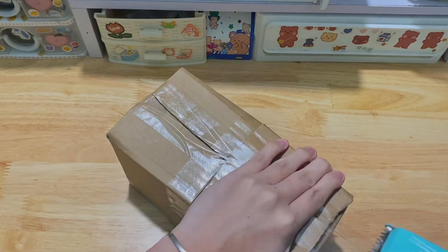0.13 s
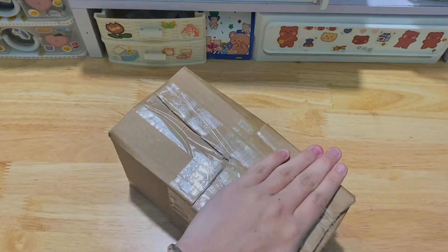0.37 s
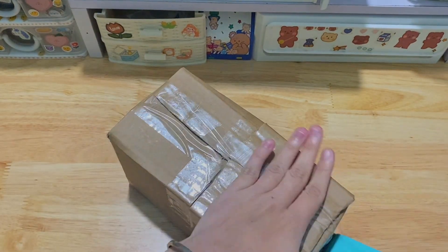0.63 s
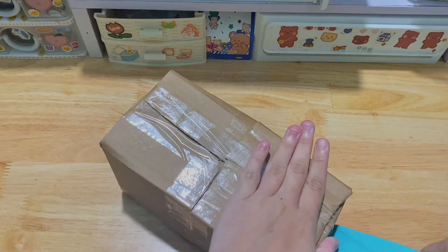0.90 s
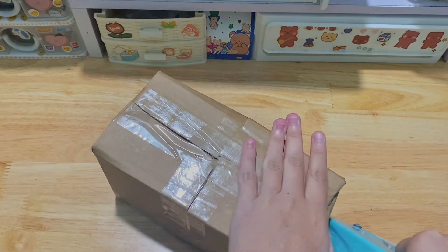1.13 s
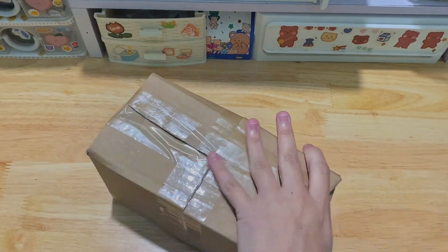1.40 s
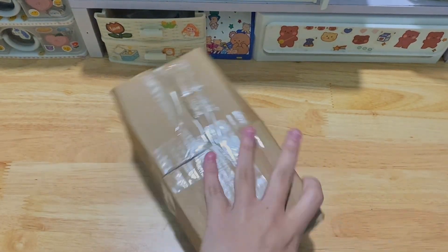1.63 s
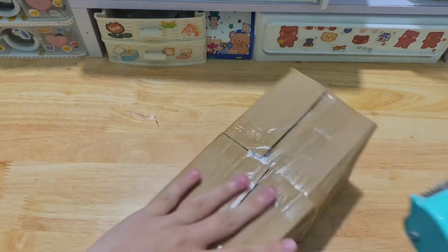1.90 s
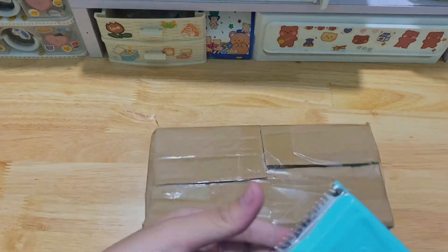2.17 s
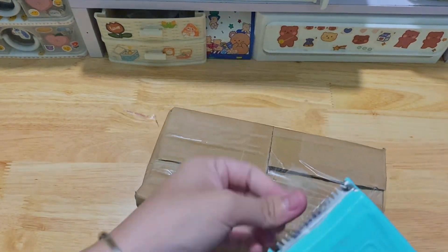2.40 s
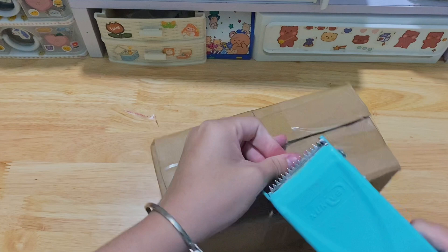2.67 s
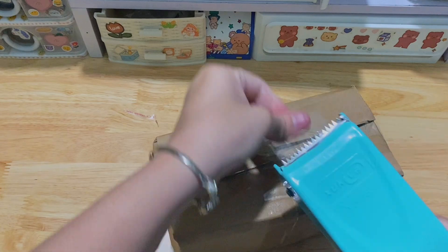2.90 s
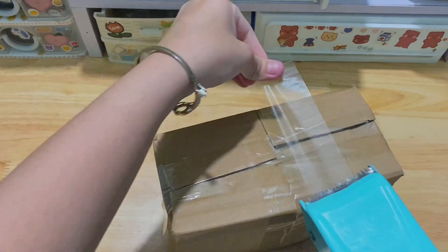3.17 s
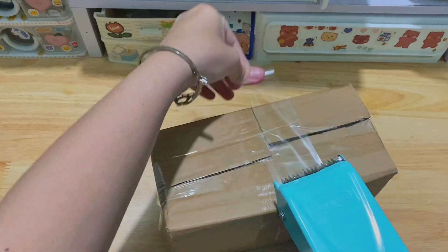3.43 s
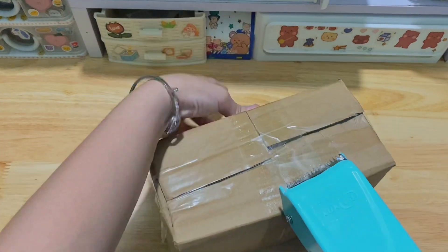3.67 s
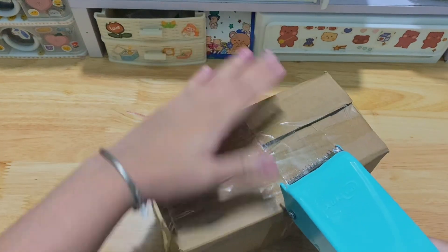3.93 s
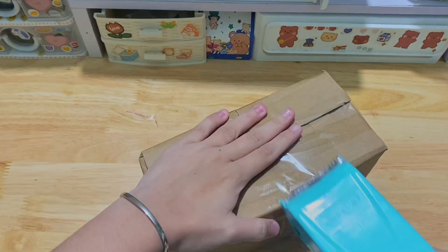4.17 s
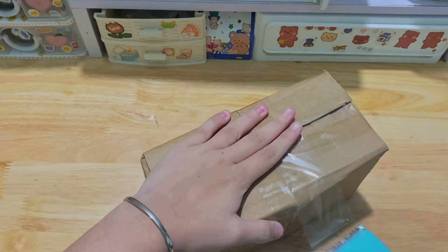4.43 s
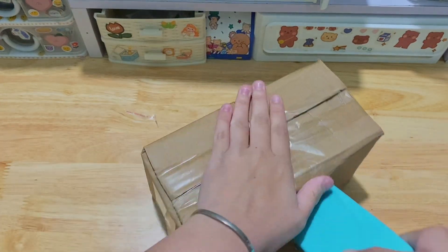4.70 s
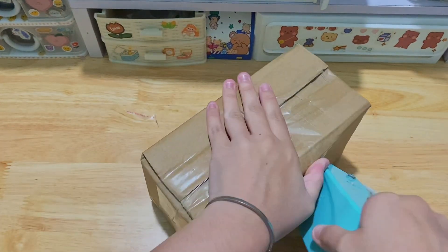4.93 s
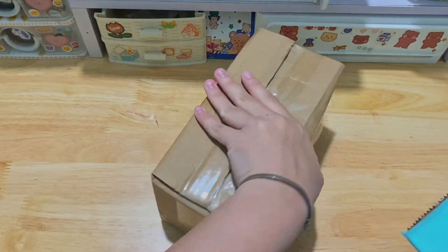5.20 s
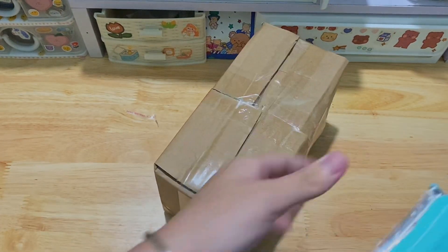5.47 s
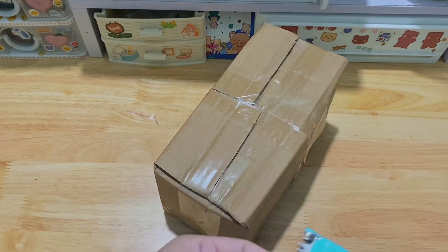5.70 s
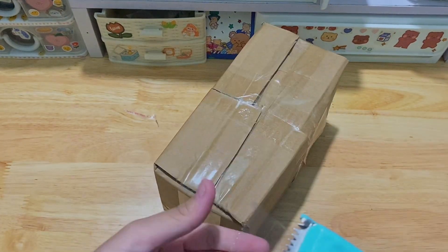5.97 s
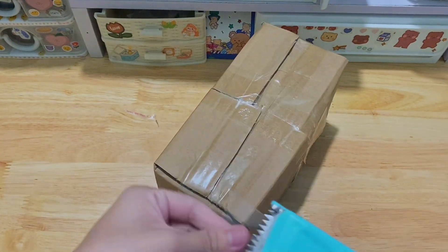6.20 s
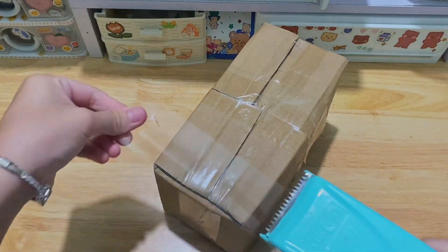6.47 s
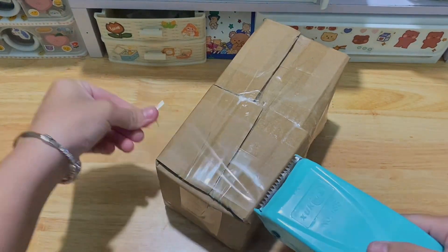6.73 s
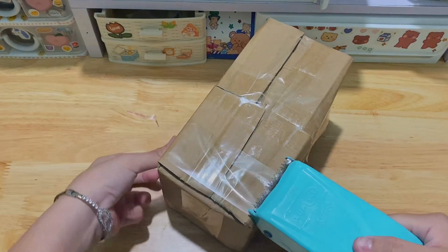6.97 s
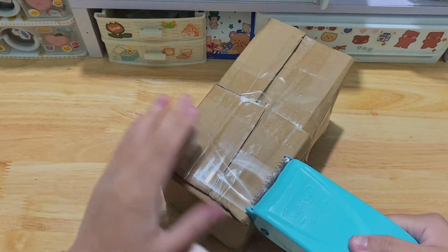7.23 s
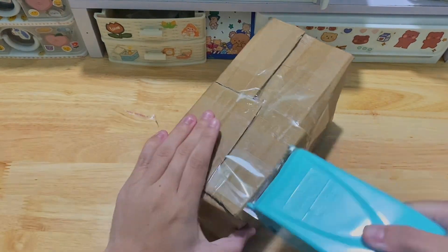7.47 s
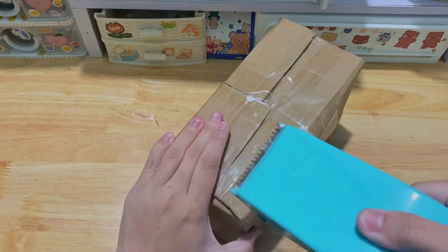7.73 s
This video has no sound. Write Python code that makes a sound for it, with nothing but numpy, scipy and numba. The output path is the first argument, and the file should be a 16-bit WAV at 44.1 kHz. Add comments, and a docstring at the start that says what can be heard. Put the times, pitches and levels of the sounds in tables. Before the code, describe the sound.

Very close in a small quiet room, tape rips off a handheld dispenser in stuttering jerks, then hands pat a hollow cardboard box. Film rustles and the dispenser ticks before another harsh pull, a loud snap and a flurry of thumps. A last short pull is followed by quiet handling, crackles and a soft press. A faint low rumble stays underneath.

```python
"""Packing tape pulled over a box

Tape comes off a handheld plastic dispenser in jerks, is pressed onto a cardboard box and torn at the blade.
Glue lets go in bursts of tiny noise pulses that ring resonances; single snaps and ticks are cracks of noise.
Palms thud on the box as sums of fading sines; filtered grains make the film rustle and the box scrape on
a wooden table. A finger squeaks in a small room with a low rumble; a phone close by limits the loudest moments."""
import sys
import numpy as np
from scipy import signal
from scipy.fft import rfft, irfft, next_fast_len
from scipy.io import wavfile
from scipy.ndimage import uniform_filter1d, minimum_filter1d
from numba import njit

SR = 44100
rng = np.random.default_rng(int(sys.argv[2]) if len(sys.argv) > 2 else 0)


def volts(x):
    """Linear amplitude factor 10**(x/20) for a level x in dB, scalar or array-like."""
    e = np.asarray(x, float) / 20
    return 10 ** e


def master(y):
    """Save y as 16-bit WAV."""
    cut = np.clip(np.atleast_2d(y).T, -1, 1)
    pcm = np.round(cut * 32767)  # scale
    wavfile.write(sys.argv[1], SR, pcm.astype(np.int16))


N = 346626
T = np.arange(N) / SR  # seconds


def unit(x):
    """Scaled to rms 1."""
    return x / np.sqrt(np.mean(x ** 2))


def on_log(table, hz):
    """Table of (Hz, value) read on a log-frequency axis."""
    f, v = np.transpose(table)
    return np.interp(np.log(hz + 1), np.log(f + 1), v)


def colour(x, table):
    """Causal (minimum-phase) filter with the spectrum of (Hz, dB) points."""
    cepstrum = irfft(on_log(table, np.fft.rfftfreq(4096, 1 / SR)) * np.log(10) / 20)
    # folding the cepstrum makes the filter respond only after its input
    cepstrum[1:2048] *= 2
    cepstrum[2049:] = 0
    response = irfft(np.exp(rfft(cepstrum)))
    return signal.fftconvolve(x, response)[:len(x)]


def ring(x, modes):
    """Sum of (Hz, width Hz, dB) resonances with alternating sign."""
    out = 0
    for k, (hz, width, db) in enumerate(modes):
        peak = signal.iirpeak(hz, hz / width, SR)
        out = out + (-1) ** k * volts(db) * signal.lfilter(*peak, x)
    return out


def band(x, lo_hz, hi_hz):
    """Band-pass."""
    return signal.sosfilt(signal.butter(2, [lo_hz, hi_hz], "band", fs=SR, output="sos"), x)


def add(out, s, piece):
    """Mix a piece in at s seconds."""
    i = int(s * SR)
    out[i:i + len(piece)] += piece[:N - i]


def crackle(size, per_s, spread_db):
    """Sparse clicks of very uneven size."""
    happens = rng.random(size) < per_s / SR
    return happens * rng.standard_normal(size) * volts(spread_db * rng.exponential(size=size))


def strokes(table, rise, fall, rest_db):
    """Gain of movements that rise, hold and fall at set dB per second, above a resting level."""
    gain = volts(rest_db)
    for s, end, db in table:
        gain = gain + volts(db - rise * np.maximum(s - T, 0) - fall * np.maximum(T - end, 0))
    return gain


# Colour of the room's steady noise. Each row: frequency in Hz, relative level in dB per Hz.
RUMBLE_COLOUR = [(15, -37.5), (25, -2.5), (80, 7.5), (185, -11.5), (270, -12.5), (344, -10.5),
                 (2220, -38.5), (5430, -51), (6380, -45), (10400, -49.5), (16000, -90)]


def rumble():
    """Steady building noise, nearly the same left and right."""
    mid, side = (colour(rng.standard_normal(N), RUMBLE_COLOUR) for _ in range(2))
    difference = band(side, 90, 15000) * 0.44 * np.array([[1], [-1]])
    return volts(-40.5) * unit(mid + difference)


# How long the room rings on. Each row: frequency in Hz, time to fade by 60 dB in seconds.
ROOM_FADE = [(300, 0.17), (1800, 0.33), (5000, 0.22), (12000, 0.19)]


def room(x):
    """Diffuse tail of noise whose fading time depends on pitch; its bass is more alike left and right."""
    t = np.arange(SR // 2) / SR
    tail = 0
    for hz in 100 * 2 ** np.arange(0, 7.3, .5):
        mid, side = (band(rng.standard_normal(len(t)), hz / 2 ** .25, hz * 2 ** .25) for _ in range(2))
        side_share = min(0.33 + hz / 630.0, 1)
        both = mid + side_share * side * np.array([[1], [-1]])
        tail = tail + volts(-60 * t / on_log(ROOM_FADE, hz)) * both
    # silent for 2 ms, then swelling in
    tail = tail * np.clip((t - .002) / 0.0017, 0, 1)
    tail = tail / np.sqrt(np.sum(tail ** 2) / 2)
    return signal.fftconvolve(x[None], tail, axes=1)[:, :N]


# Timing between the phone's two microphone ports. Each row: frequency in Hz, lead of the left in radians.
PORT_LEAD = [(0, 0), (1800, -.1), (2900, .8), (6500, .2), (8000, -2.1), (9700, -6.1), (12900, -10.4),
             (16000, -15.8)]
# Loudness between the ports. Each row: frequency in Hz, left minus right in dB.
PORT_LEVEL = [(1300, 0), (2400, 1.5), (4400, 2.5), (8000, 0)]


def ports(x):
    """A near source reaches the two ports with a phase and level difference that depends on pitch."""
    size = next_fast_len(N)
    hz = np.fft.rfftfreq(size, 1 / SR)
    phase = np.exp(.5j * np.interp(hz, *np.transpose(PORT_LEAD)))
    lead = volts(on_log(PORT_LEVEL, hz) / 2) * phase
    spectrum = rfft(x, size)
    left = irfft(spectrum * lead, size)[:N]
    right = irfft(spectrum / lead, size)[:N]
    return np.array([left, right])


# A finger squeaks over the film. Each row: time in seconds, middle pitch in Hz, middle level in dB.
SQUEAK_PATH = [(5.146, 1442, -34), (5.166, 1150, -38.5), (5.184, 974, -31.5), (5.2, 924, -48)]


def squeak():
    """Stick-slip of skin: a gliding tone with its octave, breaking up as the grip wavers."""
    s, hz, db = np.transpose(SQUEAK_PATH)
    grip = unit(uniform_filter1d(rng.standard_normal(N), size=120))
    phase = 2 * np.pi * np.cumsum(np.interp(T, s, hz) * (1 + .03 * grip)) / SR
    tone = np.sin(phase) + 0.3 * np.sin(2 * phase)
    sounding = (T > s[0]) & (T < s[-1])
    return volts(np.interp(T, s, db) + 4.9 * grip) * sounding * tone


# Hands handling the film. Each row: start in seconds, end in seconds, level in dB.
FILM_MOVES = [(.35, .6, -57), (1.165, 1.4, -38.5), (1.61, 1.64, -37), (1.76, 1.92, -42.5),
              (2.2, 2.72, -39.5), (2.82, 2.9, -39), (3.4, 3.48, -50.5), (3.545, 3.6, -44.5),
              (3.66, 3.79, -50.5), (4.03, 4.2, -40.5), (4.45, 5.28, -45), (5.74, 5.93, -43.5),
              (6.14, 6.3, -47.5), (6.73, 6.8, -51.5), (6.87, 6.97, -52), (7.05, 7.08, -70),
              (7.41, 7.7, -44)]
# Colour of the rustling film. Each row: frequency in Hz, relative level in dB per Hz.
RUSTLE_COLOUR = [(300, 10), (800, -4), (1400, 4), (2000, 0.5), (4300, -2), (7000, -8.5), (10000, -17),
                 (15000, -80)]
# Ringing of the plastic dispenser, also used below. Each row: frequency in Hz, width in Hz, level in dB.
DISPENSER_MODES = [(1379, 240, 4), (1560, 222, 7), (3580, 100, -14.5), (4847, 270, -12)]
# The box pressed or pushed along the table. Each row: start in seconds, end in seconds, level in dB.
BOX_MOVES = [(.01, .3, -28), (1.16, 1.4, -41.5), (1.53, 1.58, -37.5), (1.86, 1.92, -46.5),
             (2.52, 2.62, -39.5), (3.44, 3.6, -43), (4.04, 4.75, -47), (4.79, 4.88, -44.5),
             (5.82, 5.92, -46.5), (6.14, 6.25, -42.5), (6.74, 6.8, -47.5), (7.43, 7.5, -37.5)]
# Ringing of the box, also used for the thuds.
# Each row: frequency in Hz, level in dB, time to fade by 60 dB in seconds (here it sets the width).
BOX_MODES = [(66.3, -10.5, 0.26), (103.1, -2, 0.17), (168, 2, 0.081), (259.3, -3, 0.054),
             (361, -0.5, 0.049), (446.6, 5.5, 0.041), (528, 5.5, 0.033), (660.5, -1, 0.032),
             (920, -11, 0.033), (1212, -19, 0.03)]


def rubbing():
    """Film crinkles in fine grains and shakes the dispenser; the box scrapes through its own modes."""
    # grains come in patches a few milliseconds long
    patches = uniform_filter1d(np.abs(crackle(N, per_s=300., spread_db=2.0)), size=300)
    grains = (unit(patches) + 0.82) * rng.standard_normal(N)
    film = unit(colour(grains, RUSTLE_COLOUR))
    shaken = unit(ring(grains, DISPENSER_MODES))
    rustle = unit(film + 0.087 * shaken) * strokes(FILM_MOVES, rise=452.5, fall=170, rest_db=-76.5)
    bumps = unit(crackle(N, per_s=150., spread_db=2.5)) + .8 * rng.standard_normal(N)
    hollow = unit(ring(bumps, [(hz, 10.0 / t60, db) for hz, db, t60 in BOX_MODES]))
    grit = volts(-12) * unit(band(grains, 560, 2270))
    scrape = (hollow + grit) * strokes(BOX_MOVES, rise=206, fall=101, rest_db=-50.5)
    return rustle + scrape


# Palm and dispenser on the box. Each row: time in seconds, peak of the box ringing in dB, contact in ms.
BOX_HITS = [(0.638, -12, 0.17), (0.91, -21.5, 0.67), (0.957, -25.5, 2.8), (0.994, -19, 1.5),
            (1.019, -18.5, 0.79), (1.16, -22, 1.2), (1.204, -7, 0.5), (1.281, -8.5, 1.6), (1.334, -8, 1.3),
            (1.356, -11, 1.8), (1.523, -13, 2), (1.808, -25, 1.2), (2.365, -25.5, 0.83),
            (2.509, -13.5, 2.36), (2.6, -16, 1.57), (3.384, -22, 1), (3.462, -24.5, 0.31),
            (3.582, -21, 2.7), (3.659, -7, 1.76), (4.017, -3, 1.55), (4.042, -18, 3.4),
            (4.594, -13.5, 0.72), (4.746, -17.5, 0.55), (4.784, -8.5, 1.7), (4.812, -17, 0.57),
            (4.828, -5, 2.23), (4.852, -10, 1.9), (4.96, -17, 0.51), (4.977, -14.5, 1.14),
            (4.999, -13.5, 0.59), (6.867, -19.5, 0.56), (6.916, -22.5, 1.5), (6.958, -12, 2.4),
            (7.34, -30, 0.62), (7.511, -14, 2.7), (7.631, -29, 0.99)]


def thuds():
    """Fingers land one after another on the box; bending waves bring the low modes late."""
    slap_db, slap_ms = -13, 5.1  # skin slapping the cardboard: level against the blow, fading time
    out = np.zeros(N)
    t = np.arange(16384) / SR
    for s, db, ms in BOX_HITS:
        chance = rng.standard_normal((len(BOX_MODES), 3))
        body = 0
        for (hz, mode_db, t60), (a, b, c) in zip(BOX_MODES, chance):
            late = np.maximum(t - 0.122 / np.sqrt(hz), 0)
            # a brief tap hardly moves the large, low modes
            swell = (1 - np.exp(-late * hz * 2.25)) / (1 + (54.0 / (hz * ms)) ** 2)
            fade = volts(mode_db + 2.1 * a - 60 * late / t60)
            body = body + swell * fade * np.sin(2 * np.pi * hz * (1 + 0.087 * b) * late + 2 * c)
        fingers = crackle(600, per_s=250., spread_db=-2.5) * 0.69
        fingers[0] = 1
        push = np.convolve(fingers, np.hanning(int(max(ms, .2) * SR / 1000) + 2))
        blow = signal.fftconvolve(body, push)
        slap = band(rng.standard_normal(2048) * np.exp(-t[:2048] * 1000 / slap_ms), 450, 1330)
        # the blow starts 4 ms early because its modes arrive late
        add(out, s - .004, volts(db) * blow / np.abs(blow).max())
        add(out, s, volts(db + slap_db) * slap / np.abs(slap).max())
    return out


# Film and glue cracking on the box or at the blade. Each row: time in seconds, peak in dB, brightness in dB.
CRACKS = [(0.5482, -28, -41), (0.6242, -16.5, -5), (0.9068, -6.5, -18.5), (0.9125, -9.5, -0.5),
          (0.956, -3, 1.5), (0.991, 1.5, 14.5), (1.019, -6, -4.5), (1.1848, -11.5, 1.5), (1.2074, 2.5, -3),
          (1.2975, -4.5, -46), (1.3369, -3.5, -54), (1.4719, -26.5, -30.5), (1.287, -15.5, 0.5),
          (2.3658, -9.5, -15), (2.5423, -8.5, -26.5), (2.5641, -8.5, -31), (2.616, -22, 12.5),
          (3.4811, -25, -18), (3.562, -10, 4), (3.6602, -8, -11), (4.0187, -10, -39), (4.0698, -22.5, 6),
          (4.1095, -1.5, 3.5), (4.1432, 15, -52.5), (4.534, -23, -12.5), (4.5535, -28.5, -17),
          (4.665, -22.5, -16), (4.6877, -22, -4.5), (4.7083, -31, 1.5), (4.7427, -3, -5),
          (4.7528, -19.5, 14), (4.7826, 2.5, 1.5), (4.802, -10, 6), (4.8097, 2, -26), (4.8268, 0, -1.5),
          (4.8341, 3, -2.5), (4.846, -1.5, -11), (4.8537, -4, 16), (4.8623, -5, -5.5),
          (4.9776, -8.5, -41.5), (4.9974, -6, -3.5), (5.015, -7.5, -3), (5.2314, -28, -11),
          (5.2956, -27.5, -10), (5.33, -22.5, 7), (5.4567, -31.5, 9), (5.906, -5, -5.5), (6.7705, -19, -2),
          (6.8676, -13, 1.5), (6.9144, -16.5, 8), (7.017, -37, 0), (7.3264, -40, 29), (7.4179, -18, -4.5),
          (7.4441, -15, -7.5), (7.5833, -4, -2.5), (7.6323, -0.5, -2), (7.688, -17.5, 3.5)]
# A nail or the tape end ticks the dispenser. Each row: time in seconds, peak in dB.
DISPENSER_TICKS = [(0.97, -5.5), (2.0744, -22.5), (2.157, -24), (2.214, -11), (2.222, -32), (2.2417, -21),
                   (2.2504, -7.5), (2.27, -17.5), (2.287, -25), (2.3346, -20.5), (2.3523, -24),
                   (2.376, -15.5), (2.4301, -25), (2.4462, -9), (2.5075, -22), (2.5516, -9),
                   (2.5837, -21.5), (2.6012, -16), (2.6232, -14), (2.705, -21), (2.7822, -12.5),
                   (3.3826, -17.5), (4.5948, -24.5), (5.706, -18), (5.7314, -20), (5.7912, -20),
                   (5.8165, -15.5), (5.868, -19), (6.052, -31), (6.1388, -18), (6.194, -27.5),
                   (7.0474, -28.5)]
# Colour of the bright part of a crack. Each row: frequency in Hz, relative level in dB per Hz.
FILM_COLOUR = [(1500, -18), (3000, 5.5), (4000, 3.5), (6000, -1.5), (8500, -0.5), (11000, -12.5),
               (15000, -23.5)]


def snaps():
    """Glue or film gives way, or a nail ticks: a crack, finer crackle after it, and the plastic frame's ring."""
    out = np.zeros(N)
    t = np.arange(3072) / SR * 1000  # ms
    # brightness and ring in dB: snaps hardly ring the frame, ticks ring it strongly
    touches = [(s, db, bright_db, -26) for s, db, bright_db in CRACKS]
    touches += [(s, db, -15, 8) for s, db in DISPENSER_TICKS]
    for s, db, bright_db, ring_db in touches:
        crack = rng.standard_normal(3072) * np.minimum(t / 1.15, 1) * np.exp(-t / 3.24)
        crack += 0.83 * crackle(3072, per_s=1400.0, spread_db=2.0) * np.exp(-t / 9.6)
        # each touch lands elsewhere on the frame and wakes its modes differently
        chance = rng.standard_normal(len(DISPENSER_MODES))
        frame = [(hz, w, g + 4. * c) for (hz, w, g), c in zip(DISPENSER_MODES, chance)]
        mix = volts(2.0) * unit(band(crack, 490, 3620))
        mix = mix + volts(bright_db) * unit(colour(crack, FILM_COLOUR))
        mix = mix + volts(ring_db) * unit(ring(crack, frame))
        add(out, s, volts(db) * mix / np.abs(mix).max())
    return out


# Tape letting go in a burst.
# Each row: start in seconds, end in seconds, level in dB before the band-pass, ring of the free span in Hz.
TAPE_BURSTS = [(0.001, 0.024, -1.5, 1810), (0.044, 0.063, -10.5, 2250), (0.081, 0.097, -9, 2070),
               (0.109, 0.115, -7, 2000), (0.119, 0.127, -13, 1960), (0.133, 0.143, 0.5, 1980),
               (0.155, 0.164, -7, 2020), (0.17, 0.192, -5.5, 1970), (0.205, 0.222, -3.5, 1930),
               (0.238, 0.258, -4, 1930), (0.294, 0.307, -6.5, 2830), (0.312, 0.324, -8, 3100),
               (1.207, 1.239, -20, 1910), (1.277, 1.322, -29.5, 2100), (1.339, 1.366, -17.5, 2450),
               (2.883, 2.9, -2, 2320), (2.917, 2.958, 2, 2100), (2.956, 2.997, -3.5, 1560),
               (2.998, 3.013, -4.5, 1610), (4.152, 4.168, -4.5, 2290), (4.191, 4.212, -6, 2160),
               (4.221, 4.24, -5, 1940), (4.248, 4.263, -6, 1980), (4.273, 4.296, -11.5, 2100),
               (4.3, 4.32, -9.5, 1810), (4.328, 4.349, -10.5, 1900), (5.895, 5.931, -26, 3050),
               (6.217, 6.224, -25.5, 1600), (6.225, 6.23, -7.5, 2980), (6.235, 6.252, -9.5, 3100),
               (6.244, 6.287, 6.5, 1650), (6.279, 6.327, 3.5, 2160), (6.321, 6.358, -11, 2330),
               (6.356, 6.414, -12, 1540), (7.499, 7.523, -12, 2100), (7.528, 7.556, -15, 3230)]
# Ringing of the tape roll. Each row: frequency in Hz, width in Hz, level in dB.
ROLL_MODES = [(343, 314, 2.5), (584, 73, 11), (842, 177, 4.5)]


def slips():
    """While the glue line runs it tears in uneven pulses that ring the free span, the roll and the dispenser."""
    out = np.zeros(N)
    t = np.arange(4096) / SR * 1000  # ms
    pull = last = -1
    for s, end, db, hz in TAPE_BURSTS:
        ms = (end - s) * 1000
        # a pause of more than 0.2 s starts a new pull
        pull, last = s if s - last > .2 else pull, end
        body_db = -1 - 0.2236 * ms  # short jerks shake the roll most, long runs least
        bright_db = -20.5 + 11.5 * np.exp((pull - s) / .05)  # brighter as a pull starts
        running = np.clip(t / 2.6, .2, 1) * np.exp(-np.maximum(t - ms, 0) / 1.2)
        gap, size = rng.standard_normal((2, 160))
        tears = np.zeros(4096)
        waits = np.exp(.4 * gap)
        when = (np.cumsum(waits) - waits[0]) * SR / 750.  # a typical wait is 1/750 s
        tears[when[when < 4096].astype(int)] = volts(3.1 * size[when < 4096])
        # every tear is one jolt followed by a spray of glue fibres fading within about a millisecond
        spray = signal.lfilter([1], [1, -np.exp(-1000 / (.4 * SR))], tears) + .3
        glue = running * (2.2 * tears + spray * rng.standard_normal(4096))
        span = ring(glue, [(hz, 300, 0), (2 * hz, 600, -11), (2200, 2500, -10)])
        span = span + volts(-3.0) * ring(glue, DISPENSER_MODES)
        mix = unit(span) + volts(body_db) * unit(ring(glue, ROLL_MODES))
        mix = mix + volts(bright_db) * unit(band(glue, 2630, 5320))
        add(out, s, volts(db) * mix / np.sqrt(np.mean(mix[t < ms] ** 2)))
    # twice, for steeper edges
    return band(band(out, 250, 12000), 250, 12000)


# Where the hands work. Each row: time in seconds, left minus right in dB.
HANDS_SIDE = [(0, 0), (5.3, 0), (5.8, 2.5), (7.86, 2.5)]


def scene():
    """Tape and hands near the phone, the box below them, all in the room."""
    pan_db = np.interp(T, *np.transpose(HANDS_SIDE)) / 2
    background = rumble()
    box = thuds()
    tape = squeak() + rubbing() + snaps() + slips()
    near = ports(tape) * volts(np.array([pan_db, -pan_db]))
    echoes = volts(-11.5) * room(tape) + volts(-12.5) * room(box)
    return near + box + echoes + background


@njit
def follow(x, attack, release):
    """Envelope that rises fast and falls slowly."""
    e, out = 0., np.empty(len(x))
    for i in range(len(x)):
        e += (x[i] - e) * (attack if x[i] > e else release)
        out[i] = e
    return out


def roll_off(x):
    """The treble ends steeply here."""
    return signal.sosfilt(signal.butter(12, 16460, fs=SR, output="sos"), x)


def record(dry):
    """The phone cuts the deepest bass, turns its gain down on loud bursts and holds the peaks at full scale."""
    sound = signal.sosfilt(signal.butter(2, 45., "high", fs=SR, output="sos"), dry)
    # reacts within about 4 ms, recovers over about 70 ms
    loudness = follow(np.abs(sound).max(axis=0), 1 / (.004 * SR), 1 / (.07 * SR))
    sound = sound * np.minimum(1, volts(-13.5) / (loudness + 1e-9)) ** 0.25
    # the limiter looks a few milliseconds ahead
    headroom = minimum_filter1d(np.minimum(1, 1 / (np.abs(sound).max(axis=0) + 1e-9)), size=260)
    limited = np.clip(sound * uniform_filter1d(headroom, size=200), -1, 1)
    return roll_off(limited)


dry = scene()
out = record(dry)
master(out)
```